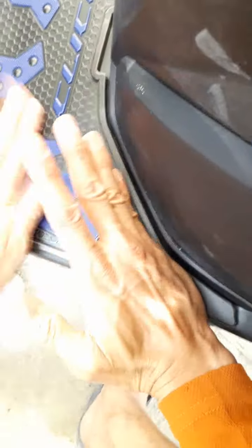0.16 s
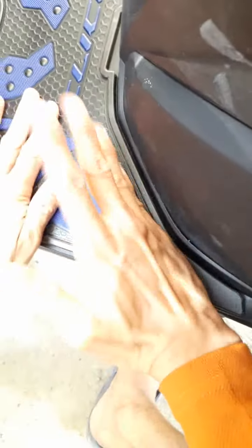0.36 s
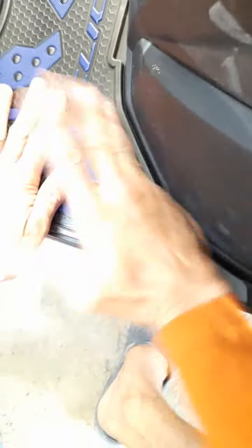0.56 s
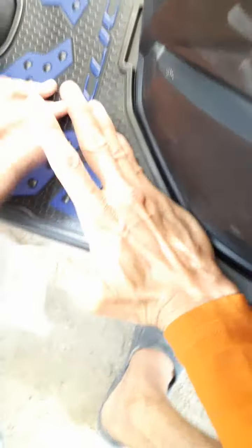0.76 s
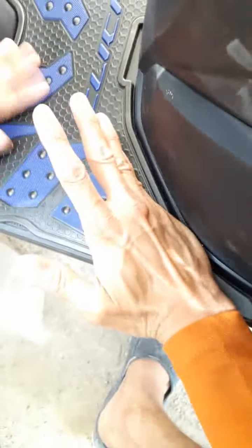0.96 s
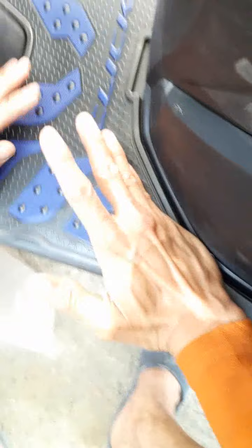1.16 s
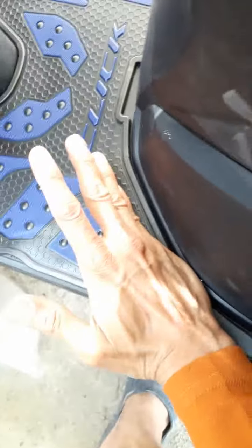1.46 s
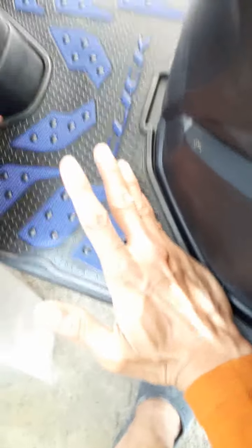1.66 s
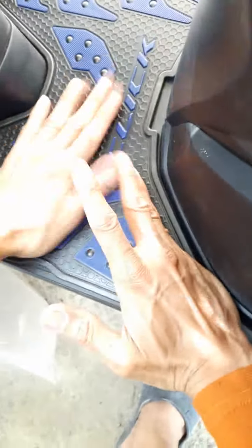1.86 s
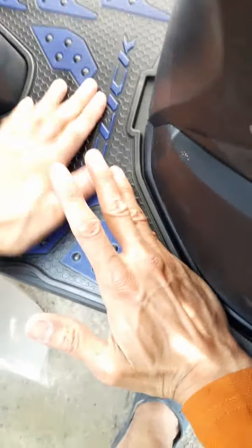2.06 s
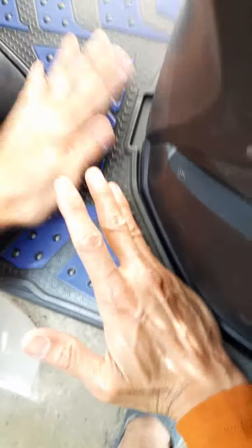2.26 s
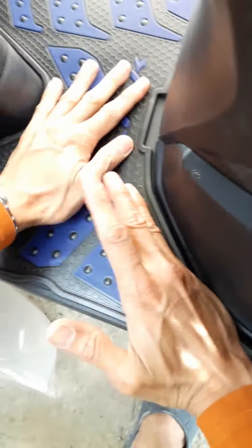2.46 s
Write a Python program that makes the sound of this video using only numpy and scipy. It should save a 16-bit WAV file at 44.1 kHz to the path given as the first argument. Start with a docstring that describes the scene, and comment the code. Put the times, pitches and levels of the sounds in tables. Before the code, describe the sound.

Bare-hand slaps on a rubber floor mat, some heavy, some light, with one sharp snapping crack

```python
"""A small hard-walled space: a hand slaps a rubber mat onto a scooter's plastic floorboard six times.
The microphone is close: fingers and palm are grainy noise bursts a few milliseconds apart, coloured by
trapped air; their weight thumps the hollow board, made of decaying sines. Brushing skin and ticking ribs
are shaped noise, and one sharp crack seats the mat's edge. Dense noise tails form the room's answer;
behind it all lie quiet air and a faint low hum."""
import sys
import numpy as np
from scipy import signal
from scipy.fft import rfft, irfft, next_fast_len
from scipy.io import wavfile
from scipy.ndimage import map_coordinates

SR = 44100
rng = np.random.default_rng(int(sys.argv[2]) if len(sys.argv) > 2 else 0)


def unload_wav(signal):
    """Save mono or channel-first audio to the path in sys.argv[1] as 16-bit WAV at rate SR, clipped to [-1, 1]."""
    wavfile.write(
        sys.argv[1],
        SR,
        np.round(np.clip(np.atleast_2d(signal).T, -1, 1) * 32767).astype(np.int16),
    )


N = 114660  # length in samples, 2.6 s

# Far off: colour of the quiet air: pitch_hz, level_db
AIR_COLOUR = [(20, -51), (45, -33), (85, 0.5), (130, -3.5), (290, 0.5), (450, -5.5), (1000, -13),
              (3500, -18.5), (7000, -22), (10500, -34.5), (13500, -30.5), (16000, -36)]
# Level of the air, which the hum follows: time_s, level_db
AIR_LEVEL = [(0, -47), (.45, -55.5), (.8, -59), (1.25, -59), (1.55, -52.5), (1.85, -53.5), (2.2, -55),
             (2.6, -54)]
HUM_HZ, HUM_DB, HUM_WAVER_DB = 87, -2.5, 1.2  # hum level is relative to the air
MIC_HISS_DB = -81

# Skin brushing the mat: centre_s, spread_s (Gaussian), level_db, squeak_db (relative to the hiss)
BRUSHES = [(0.03, .13, -46, -29), (0.344, 0.026, -53, -4), (0.938, 0.066, -58, -10),
           (1.077, 0.012, -58.5, 1), (1.144, 0.012, -58.5, 6.5), (1.365, .009, -38.5, -6),
           (1.41, 0.032, -54.5, -10), (1.622, 0.027, -52.5, 5), (1.649, 0.0071, -49.5, 0),
           (1.834, .16, -53, -16), (2.02, .06, -80, -7)]
# Colour of the sliding hiss: pitch_hz, level_db
HISS_COLOUR = [(100, 3), (400, 4), (1300, -1), (3000, -4), (6500, 0), (8500, -4.5), (10500, -16.5),
               (13500, -6.5), (16000, -18)]
# Colour of the gripping squeak: pitch_hz, level_db
SQUEAK_COLOUR = [(500, -51), (2700, -4), (3300, 3), (3750, 9), (4500, -1.5), (9000, -72)]
BRUSH_GRAIN_DB, BRUSH_TRIM_DB = 2, -1.5  # the trim applies to every stroke

# Small ticks of the mat's ribs: start_s, level_db, centre_hz, die_away_s (60 dB)
TICKS = [(0.9675, -45, 13000, .015), (0.9762, -39, 12800, 0.02), (0.9757, -34, 8100, .015),
         (1.402, -50, 12000, 0.034), (1.512, -51, 6000, 0.0067), (1.598, -50, 3700, .02),
         (1.633, -41.5, 3700, .025), (1.652, -52, 4600, 0.026), (2.405, -49.5, 820, 0.048),
         (2.568, -44, 3600, 0.022)]
TICK_OCTAVES, TICK_ATTACK_S = 0.4, 0.00088

# The mat's edge pops into its seat with one sharp crack; level is before the soft onset
SNAP_S, SNAP_DB, SNAP_HZ, SNAP_T60_S, SNAP_ATTACK_S = 1.3685, 4, 3020, 0.0032, 0.00036

# The hand's weight landing on the board: start_s, level_db, push_hz
THUMPS = [(0.1828, -8.5, 280), (0.2021, -16.5, 188), (0.2198, -10.5, 224), (0.5697, -30, 280),
          (0.5843, -33, 263), (0.630, -38.5, 129), (0.9682, -32, 236), (0.996, -41, 158), (1.371, -35, 325),
          (1.3828, -23.5, 220), (1.443, -42.5, 200), (1.8653, -18.5, 310), (1.8765, -12.5, 294),
          (2.2946, -33.5, 326), (2.2982, -21, 258)]
# Modes of the floorboard under the mat: pitch_hz, level_db, die_away_s (60 dB)
BOARD_MODES = [(125, -15, 0.24), (165.6, -9.5, 0.11), (205.4, -5.5, .16), (254.2, -0.5, 0.16),
               (303.3, -8.5, 0.13), (360, -3.5, 0.12), (449, -9, 0.11), (526, -11.5, 0.15),
               (564.5, -10, 0.12), (765, -6, 0.14), (844, -12.5, .12), (1322, -4, .12)]
PUSH_DB, PUSH_T60_S = 8.5, 0.02  # push level is relative to the thump's level
PUSH_OCTAVES, BOARD_ATTACK_S = 0.96, 0.0018

# Close up: skin meeting rubber: start_s, level_db, die_away_s (60 dB), treble_edge_hz,
# pocket_hz (trapped air), pocket_boost_db, room_db (relative to the smack)
SMACKS = [(0.1816, -8, 0.038, 5800, 830, 9.5, -6), (0.1948, -9, 0.061, 4300, 1560, -2.5, -5.5),
          (0.2024, -9.5, 0.063, 5500, 605, 11.5, -12), (0.5676, -24, 0.051, 4840, 920, 8.5, -14.5),
          (0.5752, -19.5, 0.021, 4850, 2620, 6, -13.5), (0.9562, -22.5, 0.042, 4950, 2300, 5, -11.5),
          (0.9660, -26, 0.025, 7000, 3800, 15.5, -11), (1.3677, -18, 0.017, 4400, 3330, 8, -26),
          (1.3725, -22.5, .055, 2470, 770, 2.5, -9), (1.8640, -6, 0.046, 12000, 4760, 1, -11),
          (1.8751, -19, 0.072, 7000, 1240, 3.5, -20), (2.2914, -13, 0.033, 7800, 3470, 6, -14),
          (2.2958, -17.5, 0.014, 5030, 1410, 1, -15)]
# Colour of skin on rubber: pitch_hz, level_db
SKIN_COLOUR = [(40, -23.5), (130, -3), (300, 2.5), (450, 3.5), (600, -4.5), (900, -3.5), (1080, -3.5),
               (1350, 0), (1950, -5.5), (2450, -1.5), (2900, -8.5), (3700, -2.5), (5200, -7.5), (7500, -9),
               (10500, -23), (13000, -14), (16000, -24.5)]
SMACK_ATTACK_S, BURST_GRAIN_DB, POCKET_OCTAVES = 0.0018, 2.5, 0.34
# A faint, softer-rising noise burst starting just before each smack, relative to the smack
LEAD_IN_S, LEAD_IN_DB = 0.0044, -21

# Die-away of the small space: pitch_hz, die_away_s (60 dB)
ROOM_T60 = [(100, .24), (300, .25), (1500, .26), (5000, .23), (14000, .2)]
# Colour of its answer: pitch_hz, level_db
ROOM_COLOUR = [(100, 5), (300, 3.5), (1500, 1), (3500, -2.5), (7000, 3.5), (15000, 3.5)]
BOARD_ROOM_DB, TICK_ROOM_DB, ROOM_BUILD_S = -17, -15, 0.002

CLIP_TOP = 1.05  # ceiling of the rounded peaks, 1 = full scale
LOW_CUT_HZ, TOP_HZ = 55, 15850


def amp(db):
    """Decibels to gain."""
    return 10 ** (np.asarray(db) / 20)


def unit(x):
    """Scale to rms 1."""
    return x / np.sqrt(np.mean(x ** 2) + 1e-20)


def along(points, hz):
    """Read (Hz, value) points on a log frequency axis."""
    f, v = np.transpose(points)
    return np.interp(np.log(hz + 1), np.log(f + 1), v)


def hump(hz, centre_hz, octaves):
    """A bell of height 1 around a frequency."""
    return 1 / (1 + (np.log2((hz + 1) / centre_hz) / octaves) ** 2)


def wobble(rate, size):
    """A smooth random curve, rate knots a second."""
    knots = rng.standard_normal(int(size * rate / SR) + 4)
    return map_coordinates(knots, [np.arange(size) * rate / SR])


def filtered(x, response):
    """Filter x by a gain given as a function of frequency."""
    m = next_fast_len(N + SR // 2)
    return irfft(rfft(x, m) * response(np.fft.rfftfreq(m, 1 / SR)), m)[..., :N]


def noise(colour):
    """Coloured noise of rms 1."""
    return unit(filtered(rng.standard_normal(N), lambda hz: amp(along(colour, hz))))


def causal(response, size=2048):
    """Minimum-phase impulse response of energy 1: the given gain, no sound before its start."""
    gain = np.maximum(response(np.fft.rfftfreq(size, 1 / SR)), 1e-6)
    cepstrum = irfft(np.log(gain))
    # fold the backward half onto the forward half
    cepstrum[1:size // 2] *= 2
    cepstrum[size // 2 + 1:] = 0
    h = irfft(np.exp(rfft(cepstrum)))
    return h / np.linalg.norm(h)


def add(track, s, sound):
    """Mix a sound into the track at time s."""
    part = track[round(s * SR):][:len(sound)]
    part += sound[:len(part)]


def burst(t60, attack_s, response):
    """A grainy burst of coloured noise: straight rise, exponential fall, energy set by its envelope."""
    t = np.arange(SR // 8) / SR
    grains = rng.standard_normal(len(t)) * amp(BURST_GRAIN_DB * wobble(1500, len(t)))
    rise = np.minimum(t / attack_s, 1)
    fall = amp(-60 * np.maximum(t - attack_s, 0) / t60)
    envelope = rise * fall
    coloured = signal.fftconvolve(grains * envelope, causal(response))
    return coloured * np.linalg.norm(envelope) / np.linalg.norm(coloured)


def background():
    """Quiet air and a hum wavering in pitch and level, as of a distant motor."""
    t = np.arange(N) / SR
    tone = np.sin(2 * np.pi * HUM_HZ * t + 0.5 * wobble(4, N))
    hum = unit(tone * amp(HUM_WAVER_DB * wobble(7.6, N)))
    level = amp(np.interp(t, *np.transpose(AIR_LEVEL)))
    return level * (noise(AIR_COLOUR) + amp(HUM_DB) * hum)


def room(x):
    """Near walls return a short dense tail, drawn afresh for each third of a second of sound."""
    out, size = np.zeros(N), SR // 3
    for start in range(0, N, size):
        hz, t, grid = signal.stft(rng.standard_normal(SR // 2), SR, nperseg=256)
        decay_db = -60 * t / along(ROOM_T60, hz)[:, None]
        gain = amp(along(ROOM_COLOUR, hz)[:, None] + decay_db)
        tail = signal.istft(grid * gain, SR, nperseg=256)[1]
        tail = tail * (1 - np.exp(-np.arange(len(tail)) / SR / ROOM_BUILD_S))
        tail = tail / np.linalg.norm(tail)
        add(out, start / SR, signal.fftconvolve(x[start:start + size], tail))
    return out


def brushes():
    """Skin slides over the rubber with a grainy hiss, squeaking a little where it grips."""
    t = np.arange(N) / SR
    hiss_level, squeak_level = np.zeros(N), np.zeros(N)
    for centre_s, spread_s, db, squeak_db in BRUSHES:
        stroke = amp(db) * np.exp(-((t - centre_s) / spread_s) ** 2 / 2)
        hiss_level += stroke
        squeak_level += stroke * amp(squeak_db)
    rubbing = noise(HISS_COLOUR) * hiss_level + noise(SQUEAK_COLOUR) * squeak_level
    return rubbing * amp(BRUSH_GRAIN_DB * wobble(510, N) + BRUSH_TRIM_DB)


def ticks():
    """Ribs of the mat snap against the plastic and unstick from the skin: band-limited bursts."""
    out = np.zeros(N)
    for s, db, centre_hz, t60 in TICKS:
        tick = burst(t60, TICK_ATTACK_S, lambda hz: hump(hz, centre_hz, TICK_OCTAVES))
        add(out, s, amp(db) * tick)
    return out


def snap():
    """The edge of the mat seats against the plastic: a few cycles, gone at once."""
    out, t = np.zeros(N), np.arange(SR // 50) / SR
    envelope = amp(SNAP_DB - 60 * t / SNAP_T60_S) * (1 - np.exp(-t / SNAP_ATTACK_S))
    add(out, SNAP_S, envelope * np.sin(2 * np.pi * SNAP_HZ * t))
    return out


def board():
    """Each landing gives one low push and rings most the floorboard modes nearest its pitch."""
    out, t = np.zeros(N), np.arange(SR // 3) / SR
    onset = 1 - np.exp(-t / BOARD_ATTACK_S)
    for s, db, push_hz in THUMPS:
        ring = np.zeros(len(t))
        for k, (hz, level, t60) in enumerate(BOARD_MODES):
            # each landing strikes the modes a little differently; neighbours start in opposite senses
            decay = amp(level + rng.normal(0, 1) - 60 * t / t60)
            share = hump(hz, push_hz, PUSH_OCTAVES) * (-1) ** k
            ring += share * decay * np.sin(2 * np.pi * hz * t)
        push = amp(PUSH_DB - 60 * t / PUSH_T60_S) * np.sin(2 * np.pi * push_hz * t)
        add(out, s, amp(db) * (ring + push) * onset)
    return out


def smacks():
    """Fingers and palm hit the rubber over a pocket of air; returns direct sound and room share."""
    direct, to_room = np.zeros(N), np.zeros(N)
    for s, db, t60, edge_hz, pocket_hz, pocket_db, room_db in SMACKS:
        def colour(hz):
            """Skin colour with the pocket's boost or dip, dulled above the treble edge."""
            pocket = pocket_db * hump(hz, pocket_hz, POCKET_OCTAVES)
            return amp(along(SKIN_COLOUR, hz) + pocket) / np.sqrt(1 + (hz / edge_hz) ** 3)

        smack = amp(db) * burst(t60, SMACK_ATTACK_S, colour)
        lead_in = amp(db + LEAD_IN_DB) * burst(t60, LEAD_IN_S, colour)
        add(direct, s, smack)
        add(direct, s - LEAD_IN_S, lead_in)
        add(to_room, s, amp(room_db) * smack)
    return direct, to_room


def scene():
    """Everything sits in the centre; only a trace of hiss differs between the ears."""
    smack, smack_to_room = smacks()
    tick = ticks() + snap()
    thump = board()
    echo = room(smack_to_room + amp(TICK_ROOM_DB) * tick + amp(BOARD_ROOM_DB) * thump)
    mono = background() + echo + brushes() + tick + thump + smack
    side = amp(MIC_HISS_DB) * noise([(2000, -20.5), (5000, -5.5), (15000, 2)])  # (Hz, dB)
    return np.array([mono + side, mono - side])


def record(dry):
    """The hardest peaks are rounded off; deep bass is thinned and a steep edge cuts the top."""
    rounded = dry / (1 + np.abs(dry / CLIP_TOP) ** 4) ** (1 / 4)
    low_cut = signal.butter(2, LOW_CUT_HZ, 'highpass', fs=SR, output='sos')
    thinned = signal.sosfilt(low_cut, rounded)
    return filtered(thinned, lambda hz: 1 / np.sqrt(1 + (hz / TOP_HZ) ** 140))


dry = scene()
out = record(dry)
unload_wav(out)
```